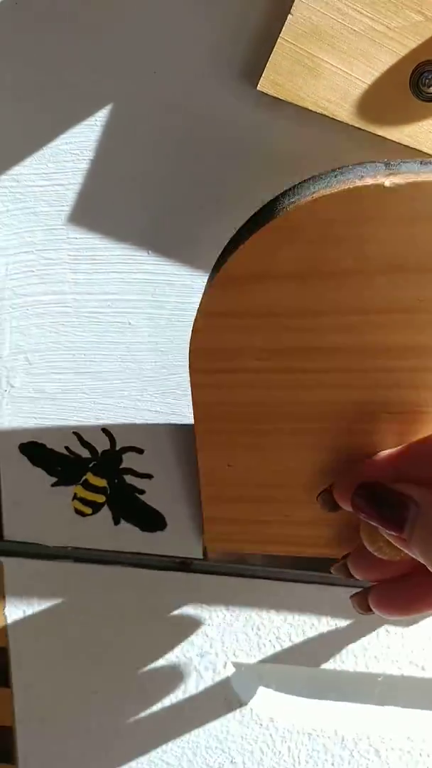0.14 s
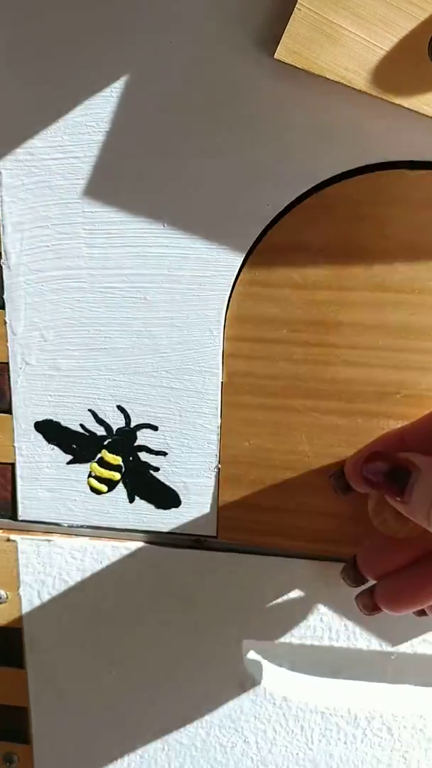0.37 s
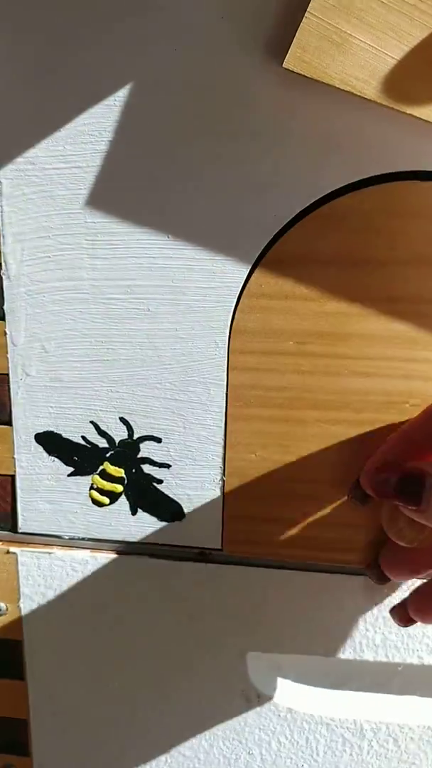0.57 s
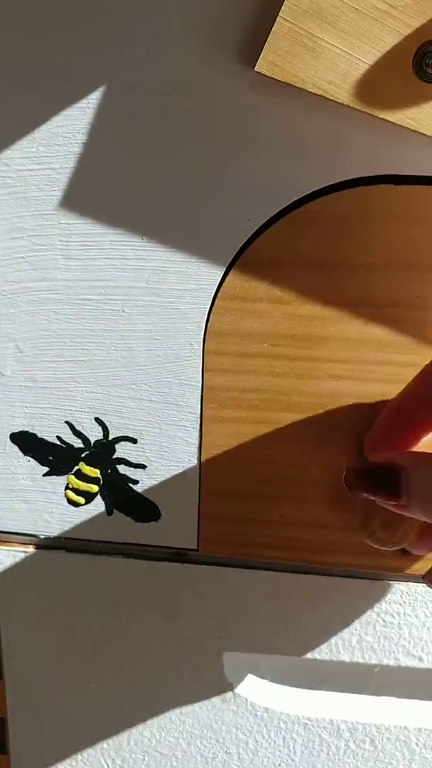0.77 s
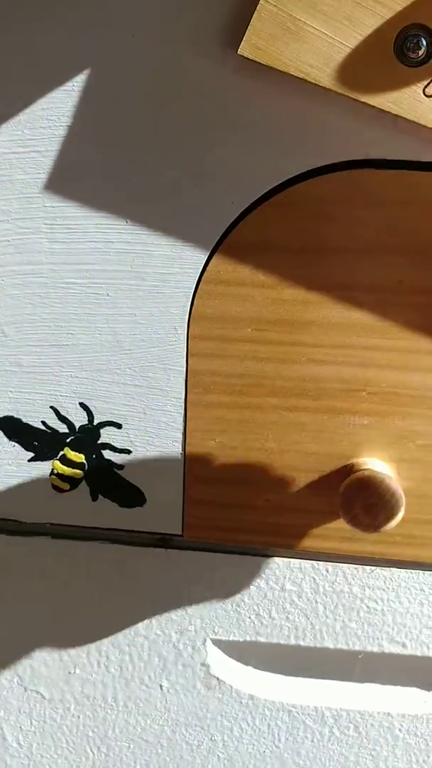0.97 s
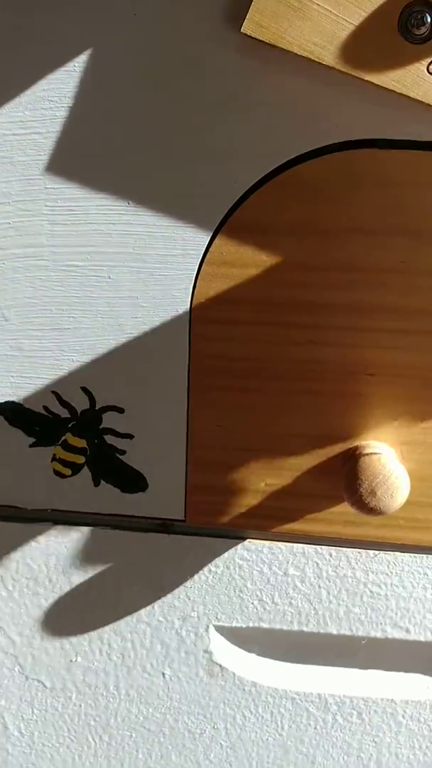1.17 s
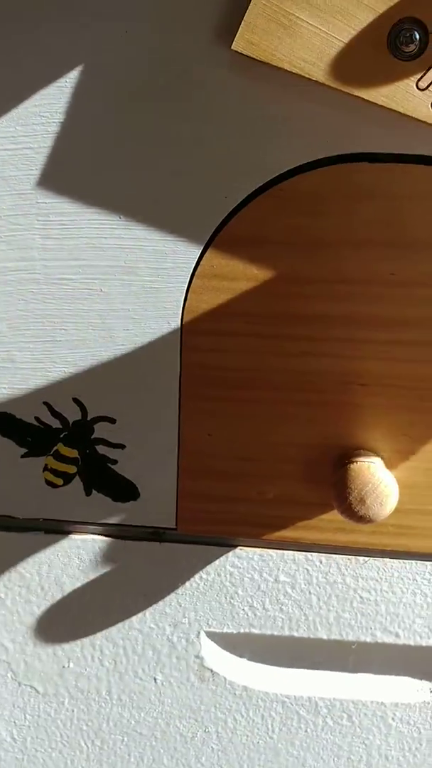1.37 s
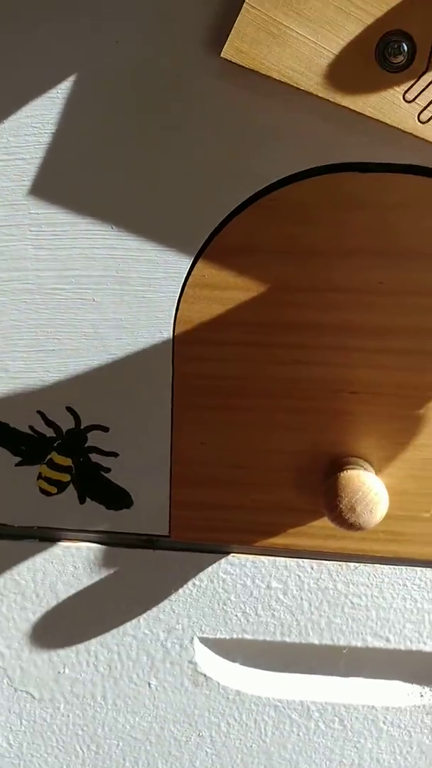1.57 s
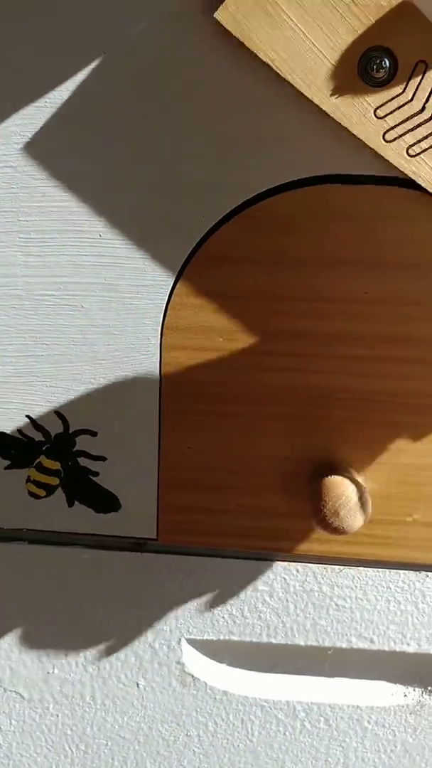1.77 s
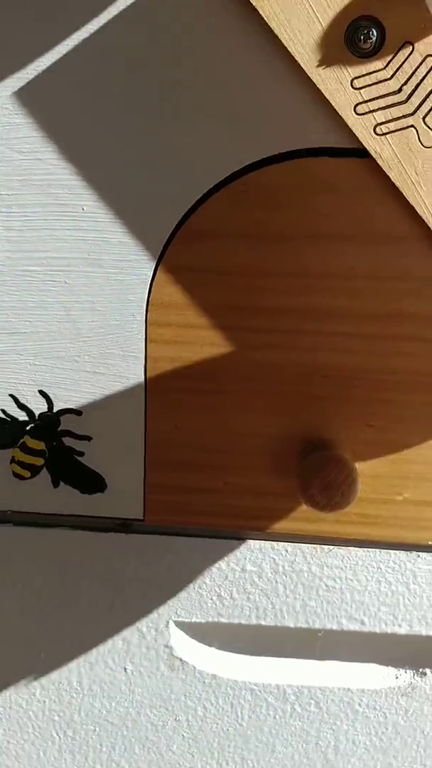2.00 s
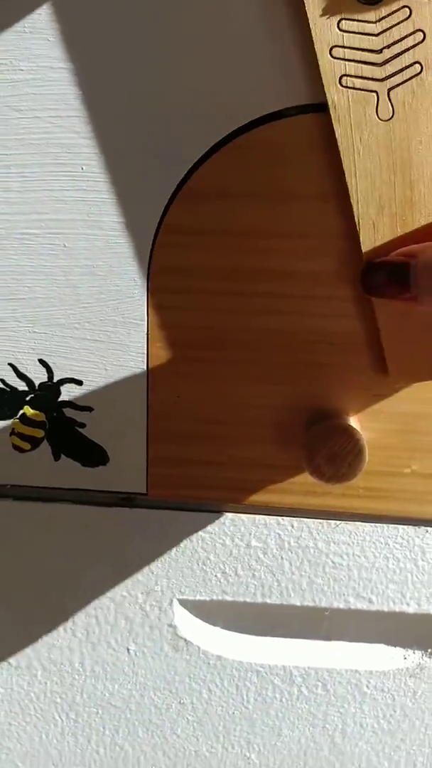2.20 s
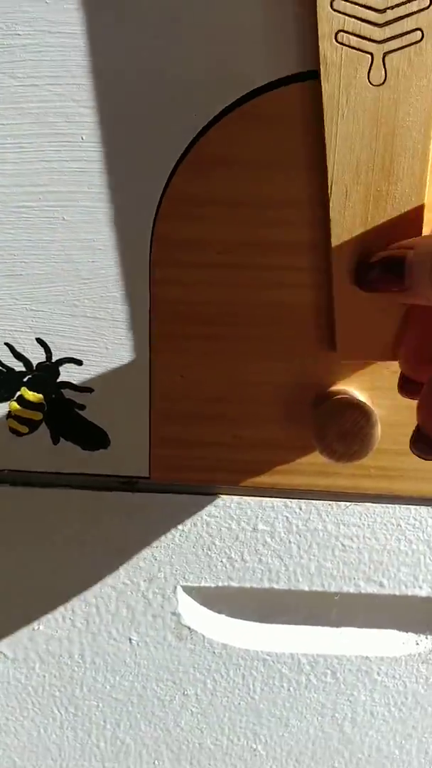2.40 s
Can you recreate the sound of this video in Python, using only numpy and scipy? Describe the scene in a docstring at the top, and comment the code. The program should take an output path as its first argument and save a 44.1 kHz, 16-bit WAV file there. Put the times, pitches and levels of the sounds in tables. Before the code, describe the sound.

A wooden cover clacks and thumps into a hollow box, then a wooden latch scrapes across it

```python
"""Wooden cover and latch

A wooden cover is slid into the opening of a painted wooden box outdoors, close by.
It rubs, clacks against the frame and is pushed home with a hollow thump; it ticks and creaks as the
hand lets go. Then a wooden latch is swivelled over it in three dry scraping strokes.
Contacts excite decaying modes; friction is dense random clicks shaped by filters and resonances."""
import sys
import numpy as np
from scipy import signal
from scipy.fft import rfft, irfft, next_fast_len
from scipy.io import wavfile
from scipy.ndimage import uniform_filter1d

SR = 44100
rng = np.random.default_rng(int(sys.argv[2]) if len(sys.argv) > 2 else 0)


def dump(signal):
    """Clip the signal to [-1, 1] and save it as 16-bit WAV at the path in sys.argv[1]."""
    limited = np.clip(np.atleast_2d(signal).T, -1, 1)
    pcm = np.round(limited * 32767).astype(np.int16)
    wavfile.write(sys.argv[1], SR, pcm)


N = 108045
TIME = np.arange(N) / SR
MICROPHONE_LAG_S = 0.00019


def from_db(db):
    """Logarithmic level: decibels to amplitude gain."""
    return 10 ** (np.asarray(db) / 20)


def rms_one(x):
    """Normalization: scale to unit root mean square."""
    return x / np.sqrt(np.mean(x ** 2) + 1e-20)


def level(rows, axis=1):
    """Envelope: gain along a dB curve, near silent outside it; a curve ending after 2 s holds its end."""
    rows = np.array(rows)
    after_db = rows[-1, axis] if rows[-1, 0] > 2 else -140
    return from_db(np.interp(TIME, rows[:, 0], rows[:, axis], left=-140, right=after_db))


def colour(x, points):
    """Minimum-phase filtering: a causal filter whose response follows (hz, level_db) points."""
    size = next_fast_len(N + SR // 4) // 2 * 2
    hz, db = np.transpose(points)
    grid_hz = np.maximum(np.arange(size // 2 + 1) * SR / size, 1)
    gain = from_db(np.interp(np.log(grid_hz), np.log(hz), db))
    # folding the cepstrum onto positive times makes the filter causal
    cepstrum = irfft(np.log(gain))
    cepstrum[1:size // 2] *= 2
    cepstrum[size // 2 + 1:] = 0
    return irfft(rfft(x, size) * np.exp(rfft(cepstrum)))[..., :N]


def cut(x, hz, kind="low", order=2):
    """Band limiting: Butterworth low- or high-pass."""
    sections = signal.butter(order, min(hz, SR / 2 - 1000), kind, fs=SR, output="sos")
    return signal.sosfilt(sections, x)


def ring(x, hz, t60):
    """Damped oscillator: a unit click sets a sine of height 1 ringing, down 60 dB after t60 seconds."""
    r = from_db(-60 / (t60 * SR))
    w = 2 * np.pi * hz / SR
    return signal.lfilter([0, np.sin(w)], [1, -2 * r * np.cos(w), r * r], x + 1e-18)


def resonate(x, hz, width_hz):
    """Driven resonance: a two-pole band-pass with unit gain on top."""
    r = np.exp(-np.pi * width_hz / SR)
    feedback = [1, -2 * r * np.cos(2 * np.pi * hz / SR), r * r]
    return signal.lfilter(np.array([1, 0, -1]) * (1 - r * r) / 2, feedback, x)


def burst(t60, size=SR // 5):
    """Modal overlap: many modes or reflections merge into dying stereo noise of unit energy."""
    x = rng.standard_normal((2, size)) * from_db(-60 * TIME[:size] / t60)
    return x / np.sqrt(np.sum(x ** 2, axis=1, keepdims=True))


def add(out, start_s, x):
    """Superposition: mix x in at its start time."""
    first = int(start_s * SR)
    part = out[..., first:first + x.shape[-1]]
    part += x[..., :part.shape[-1]]


def microphones(x):
    """Arrival-time difference: sound reaches the left microphone just before the right."""
    return np.array([x, np.interp(TIME - MICROPHONE_LAG_S, TIME, x)])


def pan(x, left_db):
    """Level difference: lean a stereo sound to the left."""
    return x * from_db([[left_db / 2], [-left_db / 2]])


def friction(per_s, spread_db, apart_hz, judder_db=1.5, judder_hz=70):
    """Stick-slip: fibres catch and let go in dense clicks under an unsteady hand; sides differ in treble."""
    happens = rng.random((3, N)) < per_s / SR
    polarity = rng.choice([-1, 1], (3, N))
    strength = from_db(spread_db * np.minimum(rng.exponential(1, (3, N)), 4))
    judder = from_db(judder_db * rms_one(cut(rng.standard_normal(N), judder_hz)))
    clicks = happens * polarity * strength * judder
    shared_bass = cut(microphones(clicks[0]), apart_hz)
    return rms_one(shared_bass + cut(clicks[1:], apart_hz, "high"))


# spectrum of the distant outdoor hush: pitch_hz [Hz], level_db [dB]
AIR_COLOUR = [(60, -6), (140, -13.5), (380, -13), (900, -19.5), (2400, -34), (6500, -36), (9300, -31),
              (10800, -40)]


def air(air_db=-59.5, apart_hz=1190):
    """Diffuse field: steady outdoor hush, alike at both microphones only in the bass."""
    white = rng.standard_normal((3, N))
    hush = cut(white[0], apart_hz) + cut(white[1:], apart_hz, "high")
    return from_db(air_db) * rms_one(colour(hush, AIR_COLOUR))


# light touches on the cover and latch: start_s [s], level_db [relative dB], dull_above_hz [Hz]
TOUCHES = [(0.4205, -9, 12100), (1.0145, -6, 8600), (1.2455, -14, 7500), (1.5413, -10, 5800),
           (1.5843, -1.5, 13300), (1.7414, -10, 14000), (2.0412, -11.5, 14000)]
# small resonances they excite: pitch_hz [Hz], width_hz [Hz], level_db [relative dB]
TOUCH_MODES = [(754, 62, -2.5), (1290, 830, -13.5), (2990, 930, -8), (4300, 1030, -5.5), (8030, 920, -1.5)]


def ticks(snap_t60=0.018, tail_t60=0.13, tail_db=-7, left_db=4):
    """Impulse response: a light touch snaps through small resonances and leaves a faint tail."""
    touches = np.zeros((2, N))
    for start_s, level_db, dull_hz in TOUCHES:
        touch = burst(snap_t60) + from_db(tail_db) * burst(tail_t60)
        add(touches, start_s, from_db(level_db) * cut(touch, dull_hz))
    modes = sum(from_db(db) * resonate(touches, hz, width) for hz, width, db in TOUCH_MODES)
    return pan(modes, left_db)


# friction catches one resonance of the wood:
# start_s [s], end_s [s], pitch_hz [Hz], width_hz [Hz], level_db [dB]
SQUEAK_TONES = [(1.033, 1.154, 2970, 350, -64), (1.837, 1.874, 1504, 450, -32),
                (2.061, 2.103, 2960, 595, -39.5), (2.086, 2.133, 411, 111, -39),
                (2.126, 2.17, 1240, 262, -39)]


def squeak():
    """Selective resonance: friction catches one mode for a moment, heard as narrow noise."""
    out = 0
    for start_s, end_s, hz, width_hz, level_db in SQUEAK_TONES:
        active = ((TIME > start_s) & (TIME < end_s)) * 1.
        swell = uniform_filter1d(active, size=SR // 150)
        narrow = resonate(rng.standard_normal(N), hz, width_hz)
        narrow = rms_one(resonate(narrow, hz, 2 * width_hz))
        out = out + from_db(level_db) * swell * narrow
    return microphones(out)


# runs of slips: start_s [s], length_s [s], level_db [relative dB], fade_over_run_db [dB]
SLIP_RUNS = [(1.1461, 0.0595, -25.5, 0), (1.2434, 0.042, -28, -14)]
# spectrum of a slip: pitch_hz [Hz], level_db [dB]
SLIP_COLOUR = [(1600, -16.5), (2500, 0.5), (3200, -8.5), (3900, 4), (4700, 4), (5200, -6), (9100, -12),
               (10500, -41)]


def creak(gain_db=11, uneven_db=2, slip_gap_s=0.0046, slip_t60_s=0.058):
    """Relaxation oscillation: the tight cover sticks and slips in short uneven runs."""
    out = np.zeros((2, N))
    for start_s, length_s, level_db, fade_db in SLIP_RUNS:
        for k, (late, size) in enumerate(rng.standard_normal((16, 2))):
            t = max(k + late / 5, 0) * slip_gap_s
            slip_db = level_db + gain_db + fade_db * t / length_s + uneven_db * size
            add(out, start_s + t, (t < length_s) * from_db(slip_db) * burst(slip_t60_s))
    return pan(colour(out, SLIP_COLOUR), left_db=4.5)


# the cover's edge rubs along the frame: time_s [s], level_db [dB]
RUB_LEVEL = [(.165, -67), (.202, -43.5), (.234, -38), (.255, -22.5), (.283, -51), (.31, -71)]
# spectrum of the rub: pitch_hz [Hz], level_db [dB]
RUB_COLOUR = [(420, 5.5), (1000, -0.5), (1800, -5), (3000, -1.5), (7000, -5), (8400, 1.5), (10500, -10)]
# scuffs as the cover rattles in, is pushed home and touched:
# start_s [s], peak_s [s], level_db [dB], dull_above_hz [Hz]
SCUFF_EVENTS = [(0.346, 0.364, -36.5, 4500), (0.405, 0.426, -46.5, 11940), (0.487, 0.54, -36.5, 5420),
                (1.576, 1.621, -55, 11800)]


def slide(scuff_fade_db_per_s=649.5):
    """Sliding friction: the edge rubs in the frame, then chatters in scuffs that swell and die."""
    rub = rms_one(colour(friction(per_s=3000, spread_db=4.0, apart_hz=1490), RUB_COLOUR))
    out = level(RUB_LEVEL) * rub
    for start_s, peak_s, level_db, dull_hz in SCUFF_EVENTS:
        swell = np.clip((TIME - start_s) / (peak_s - start_s), 0, 1)
        fade = from_db(level_db - scuff_fade_db_per_s * np.maximum(TIME - peak_s, 0))
        out = out + swell * fade * cut(rub, dull_hz)
    return pan(out, left_db=4)


# the latch turns: time_s [s], grind_level_db [dB], hiss_level_db [dB]
LATCH_STROKES = [(1.735, -80, -77), (1.752, -51.5, -46.5), (1.798, -35.5, -38), (1.866, -29, -40),
                 (1.895, -56.5, -62), (2.036, -100, -92), (2.046, -43.5, -44.5), (2.096, -31, -35.5),
                 (2.114, -41.5, -41.5), (2.162, -37, -39.5), (2.202, -42, -38.5), (2.238, -60, -67),
                 (2.285, -67, -68.5), (2.372, -50, -45), (2.45, -52, -38.5)]
# resonances of the latch: pitch_hz [Hz], width_hz [Hz], level_db [relative dB]
LATCH_MODES = [(107, 250, -13.5), (474, 77, -2.5), (789, 83, -0.5), (1337, 420, -3), (2014, 107, 0.5),
               (2356, 190, -4), (2933, 270, -2.5)]
# resonance shift as the contact point moves: time_s [s], pitch_ratio [ratio]
CONTACT_SHIFT = [(1.77, 0.9), (1.87, 1.077), (2.16, .96)]
# spectrum of the hiss: pitch_hz [Hz], level_db [dB]
GRAIN_COLOUR = [(1500, -18), (2900, -0.5), (3700, -8.5), (4300, -4), (7200, -9.5), (9000, 4.5),
                (10500, -22), (16000, -18.5)]
# a thin rasp grows as the latch tightens: time_s [s], level_db [dB]
RASP_LEVEL = [(2.12, -50.5), (2.16, -35), (2.21, -42.5), (2.27, -72), (2.36, -43.5), (2.45, -43)]
# resonances of the rasp: pitch_hz [Hz], width_hz [Hz], level_db [relative dB]
RASP_RESONANCES = [(2857, 260, 1), (4346, 232, -3), (5300, 350, 4)]


def latch(grind_top_hz=3460):
    """Friction-driven resonance: the latch grinds through its modes, with grain hiss and a thin rasp."""
    rub = friction(per_s=2200, spread_db=2.5, apart_hz=1910)
    body = sum((-1) ** k * from_db(db) * resonate(rub, hz, width)
               for k, (hz, width, db) in enumerate(LATCH_MODES))
    grind = rms_one(cut(body, grind_top_hz))
    # reading the grind faster or slower shifts its resonances
    travel = np.cumsum(np.interp(TIME, *np.transpose(CONTACT_SHIFT))) / SR
    grind = np.array([np.interp(travel, TIME, side) for side in grind])
    grain = friction(per_s=4500, spread_db=0, apart_hz=2500)
    hiss = rms_one(colour(grain, GRAIN_COLOUR))
    rasp = rms_one(sum(from_db(db) * resonate(resonate(rub, hz, width), hz, 2 * width)
                       for hz, width, db in RASP_RESONANCES))
    low = level(LATCH_STROKES) * grind
    high = level(LATCH_STROKES, axis=2) * hiss + level(RASP_LEVEL) * rasp
    return pan(low, left_db=4.5) + pan(high, left_db=5.0)


# reflections between the box's faces: left_delay_s [s], right_delay_s [s], gain [ratio]
PANEL_PATHS = [(.00085, .00125, 0.188), (.0023, .0017, 0.23)]


def panels(x):
    """Comb filtering: reflections between the box's faces interfere with the treble of the rubbing."""
    treble = cut(x, 930, "high", order=1)
    out = x
    for left_s, right_s, gain in PANEL_PATHS:
        left = np.interp(TIME - left_s, TIME, treble[0])
        right = np.interp(TIME - right_s, TIME, treble[1])
        out = out + gain * np.array([left, right])
    return out / np.sqrt(1 + sum(row[2] ** 2 for row in PANEL_PATHS))


# the cover bumps the box:
# start_s [s], level_db [relative dB], deep_sway_share_db [dB], contact_s [s]
BUMPS = [(0.2767, -11.5, -12, 0.00017), (0.3409, -11.5, 22.5, 0.002), (0.3483, -4.5, 12.5, 0.00092),
         (0.3537, -3.5, 12.5, 0.00028), (0.359, -1, -3, 0.00076), (0.5392, -6.5, 7, 0.00089)]
# hollow ring of the box: pitch_hz [Hz], level_db [relative dB], t60_s [s]
HOLLOW_MODES = [(58, -33.5, 0.24), (106, -31, 0.058), (149, -23.5, 0.084), (322.3, -20.5, 0.051),
                (392.3, -17.5, 0.051), (451.4, -12, 0.048), (598.4, -18.5, 0.022), (687, -17.5, 0.019)]


def thumps(left_db=0.5, sway_below_hz=125):
    """Modal excitation: soft pushes ring the hollow box; its deep sway moves against the panel modes."""
    knock, sway = np.zeros(N), np.zeros(N)
    for start_s, level_db, sway_db, contact_s in BUMPS:
        push = np.sin(np.pi * np.minimum(TIME / contact_s, 1))  # half-sine force
        push = push / push.sum()
        add(knock, start_s, from_db(level_db) * push)
        add(sway, start_s, -from_db(level_db + sway_db) * push)
    box = sum(from_db(db) * ring(sway if hz < sway_below_hz else knock, hz, t60)
              for hz, db, t60 in HOLLOW_MODES)
    return pan(microphones(box), left_db)


# hard contacts of wood on wood: start_s [s], level_db [relative dB], dull_above_hz [Hz]
CONTACTS = [(0.1628, -39.5, 3800), (0.2485, -20, 14100), (0.2587, -1, 10270), (0.3400, -2.5, 7340),
            (0.354, -13.5, 4000), (0.538, -18.5, 4000)]
# spectrum of the cracks: pitch_hz [Hz], level_db [dB]
CRACK_COLOUR = [(100, -18.5), (400, -3.5), (1900, 2), (2800, 8), (5800, 4), (7000, -5.5), (9000, 8.5),
                (10500, -13.5), (16000, -1.5)]
# ring of the cover: pitch_hz [Hz], level_db [relative dB]
COVER_RING = [(910, -4), (1464, -4), (2600, -1.5), (3450, -6.5), (4200, -6.5), (5720, 1)]


def clacks(lift_hz=6500, snap_db=6, noise_db=12, left_db=4, crack_t60_s=0.021,
           cover_t60_s=0.042, ring_db=-20, bright_hz=8700):
    """Impact: each contact snaps, cracks and sets the cover ringing; harder ones are brighter."""
    cracks, taps = np.zeros((2, N)), np.zeros(N)
    snap = signal.unit_impulse(SR // 5)
    stereo_snap = np.array([snap, np.roll(snap, int(MICROPHONE_LAG_S * SR))])
    for start_s, level_db, dull_hz in CONTACTS:
        crack = from_db(noise_db) * burst(crack_t60_s) + from_db(snap_db) * stereo_snap
        crack = cut(crack, dull_hz)
        # treble is raised or lowered with the contact's own limit
        lift = (dull_hz / bright_hz - 1) * cut(crack, lift_hz, "high", order=1)
        add(cracks, start_s, from_db(level_db) * (crack + lift))
        add(taps, start_s, from_db(level_db) * cut(snap, dull_hz))
    modes = np.zeros((2, N))
    for k, (hz, level_db) in enumerate(COVER_RING):
        side_signs = [[(-1) ** k], [(-1) ** (k // 2)]]
        modes += from_db(level_db) * ring(taps, hz, cover_t60_s) * side_signs
    return pan(colour(cracks, CRACK_COLOUR) + from_db(ring_db) * modes, left_db)


def scene(echo_db=-15.5, echo_t60_s=0.094):
    """Superposition and reverberation: the wood sounds, their short reflections and the open air."""
    rubbing = panels(slide() + creak() + latch())
    wood = clacks() + ticks() + thumps() + rubbing + squeak()
    echoes = signal.fftconvolve(wood, burst(echo_t60_s, size=16000), axes=1)[:, :N]
    return wood + from_db(echo_db) * echoes + air()


def record(dry):
    """Band limiting and clipping: the microphone loses deep bass, clips at full scale and cuts the top."""
    clipped = np.clip(cut(dry, 50, "high", order=5), -1, 1)
    top_cut = signal.cheby2(14, 60, 16400, fs=SR, output="sos")  # 60 dB down from 16400 Hz
    return signal.sosfilt(top_cut, clipped)


dry = scene()
out = record(dry)
dump(out)
```